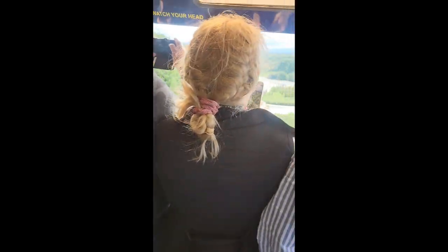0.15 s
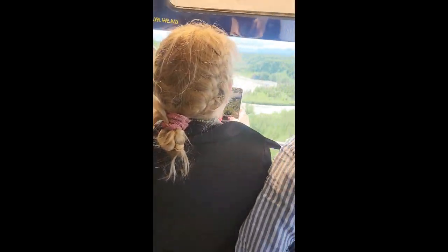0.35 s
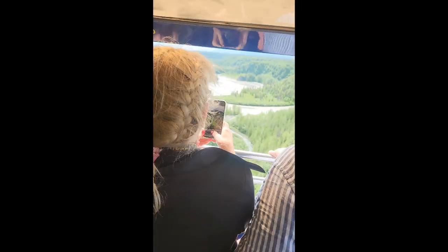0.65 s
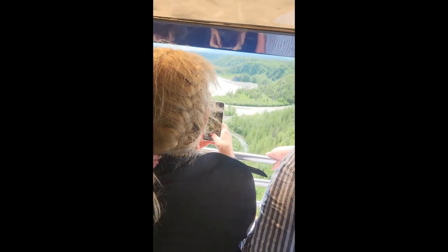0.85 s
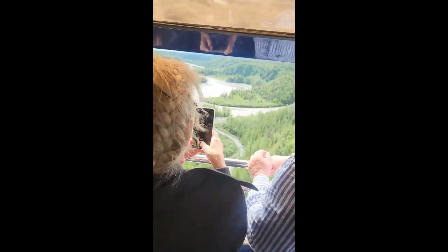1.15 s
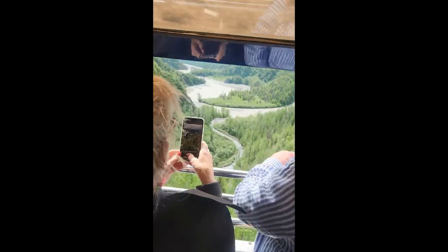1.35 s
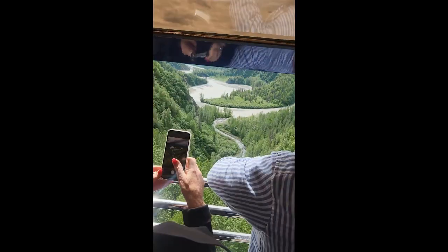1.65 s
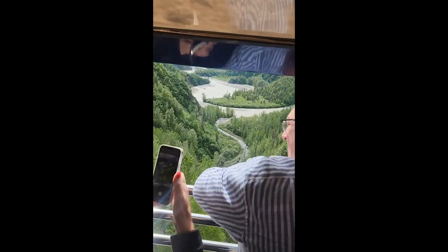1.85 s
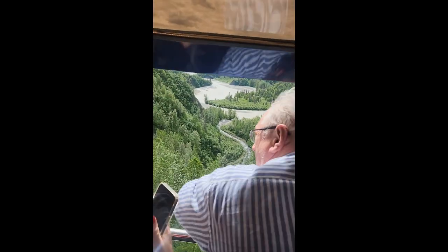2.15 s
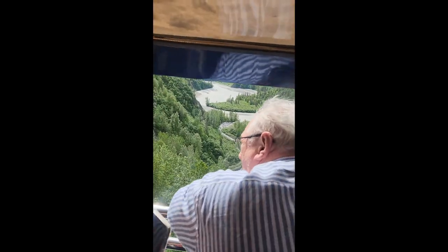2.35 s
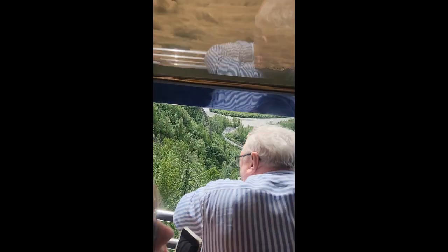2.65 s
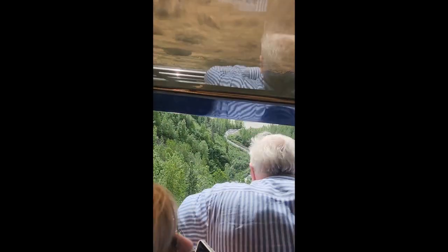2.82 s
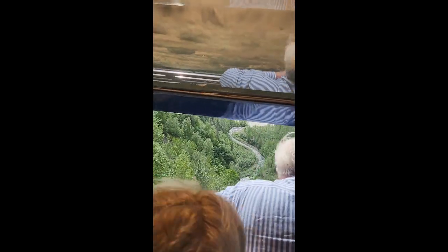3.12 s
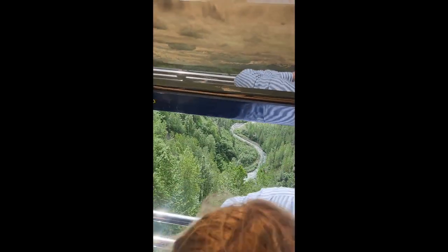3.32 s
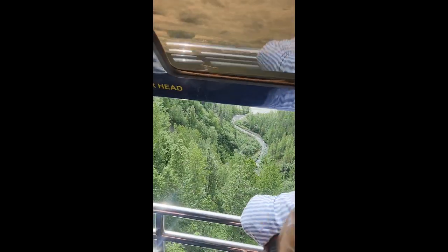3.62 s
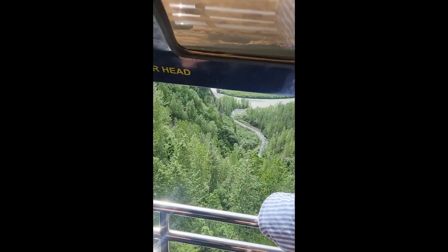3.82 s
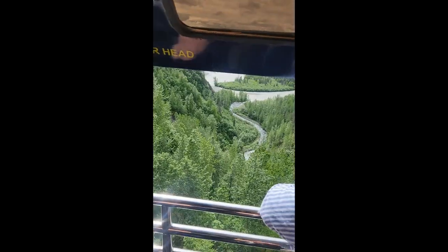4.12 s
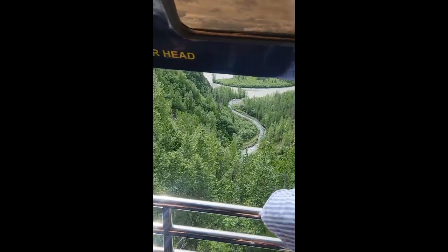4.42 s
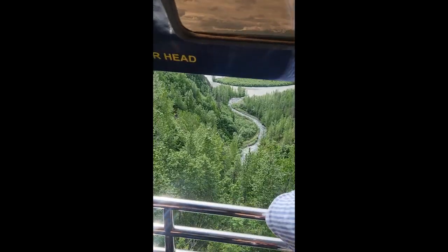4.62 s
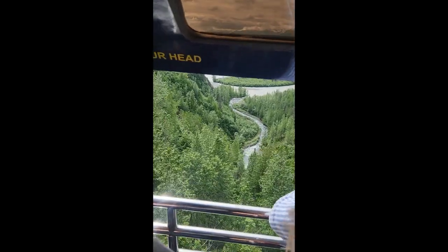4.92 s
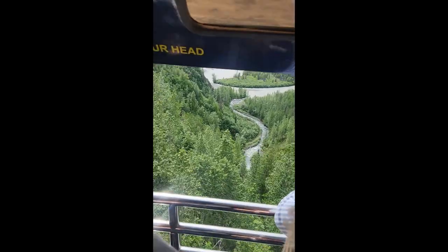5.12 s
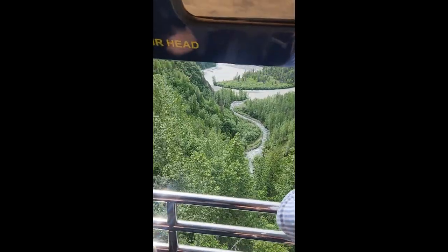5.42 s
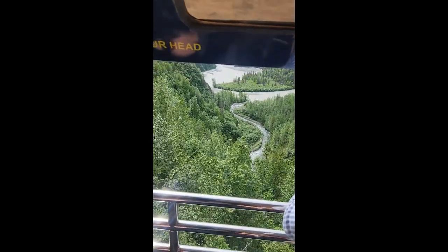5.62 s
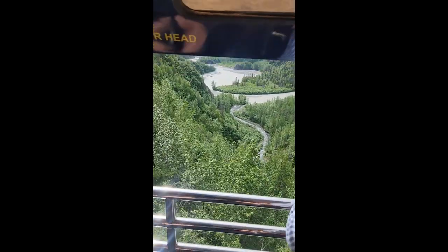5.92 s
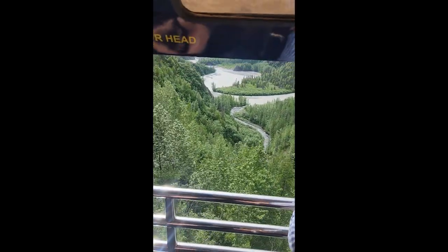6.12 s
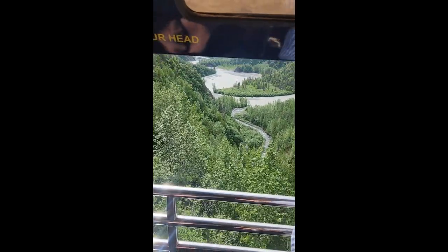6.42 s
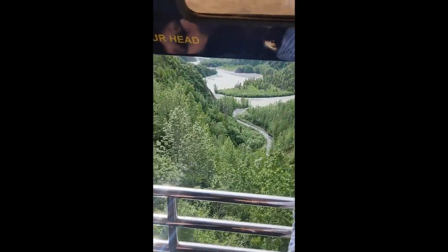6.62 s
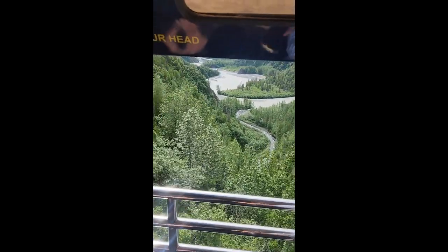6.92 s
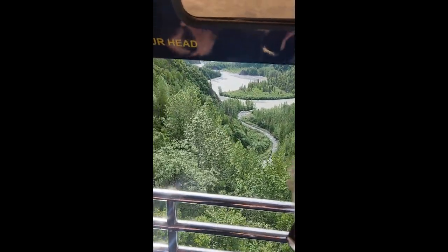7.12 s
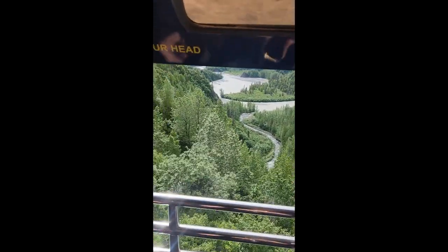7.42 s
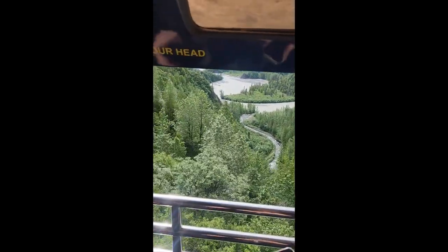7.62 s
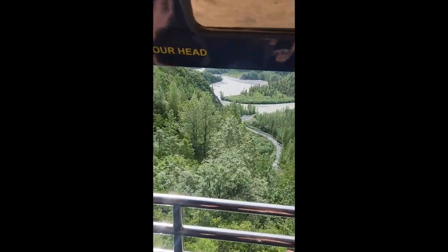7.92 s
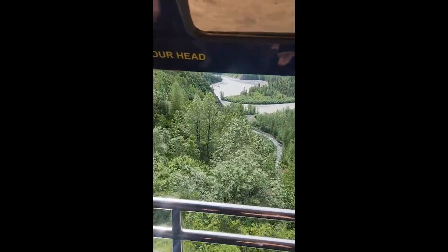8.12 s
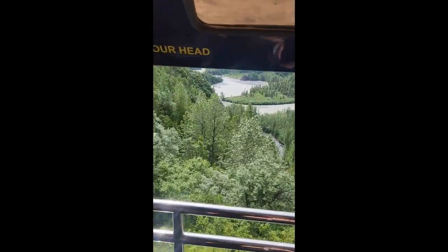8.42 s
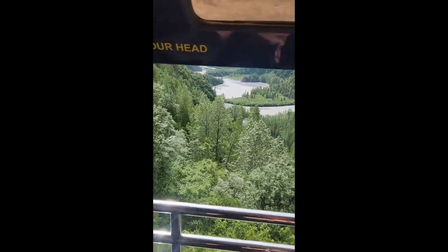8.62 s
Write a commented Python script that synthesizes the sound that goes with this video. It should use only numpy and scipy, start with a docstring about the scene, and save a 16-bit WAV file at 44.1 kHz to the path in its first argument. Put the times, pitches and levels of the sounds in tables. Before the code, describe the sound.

A passenger train creeps over a steel bridge with deep deck rumble, banging rail joints, loose rattling steel, thin wheel squeals and dry close ticks.

```python
"""A passenger train creeps over a steel bridge, heard from an open platform between coaches.
From the start the deck rumbles and the wheels roar and hiss, all made of shaped noise; small dry ticks
and knocks sound close to the right microphone of a hand-held pair, and wheels squeal in narrow tones.
From 1.7 s axles bang over rail joints: bursts of noise, a low boom and ringing loose steel.
A thin whine flickers from 6.7 s, a short rasp of steel on steel comes near the end; faint top noise stays."""
import sys
import numpy as np
from scipy import signal
from scipy.fft import rfft, irfft, next_fast_len
from scipy.io import wavfile
from scipy.ndimage import uniform_filter1d

SR = 44100
rng = np.random.default_rng(int(sys.argv[2]) if len(sys.argv) > 2 else 0)


def wav_record(signal):
    """Record a signal, one row per channel, as 16-bit PCM in the file named by sys.argv[1]."""
    frames = np.transpose(np.atleast_2d(signal))
    bounded = np.clip(frames, -1, 1)
    # unit amplitude maps onto the largest positive 16-bit level
    quanta = np.round(bounded * 32767).astype(np.int16)
    wavfile.write(sys.argv[1], SR, quanta)


N = 386316

# Bursts of shaking as axles cross rail joints; a bang may take two or three rows. Levels before each
# band's own colour. Each row: start in seconds, thud level in dB, clank level in dB,
# rattle level in dB, length of the shaking in seconds.
BANG_BURSTS = [(1.704, -22.5, -38, -45, 0.025), (1.735, -27, -29.5, -36.5, 0.016),
               (2.273, -15.5, -25, -41.5, 0.023), (2.359, -27.5, -33, -40, 0.02),
               (2.443, -14.5, -28.5, -10.5, 0.02), (2.467, -30, -19, -20, 0.022),
               (2.518, -32, -24, -30, 0.01), (3.016, -13, -21.5, -20.5, 0.02),
               (3.052, -27, -21, -28.5, 0.034), (3.101, -25.5, -38, -31.5, 0.03),
               (3.49, -17.5, -30.5, -45.5, 0.034), (4.068, -20.5, -38, -69, 0.029),
               (4.233, -15, -21, -26.5, 0.044), (4.811, -21, -35, -30, 0.02),
               (4.837, -19.5, -25.5, -27, 0.044), (5.179, -24, -60.5, -46, 0.013),
               (7.106, -25, -36, -47, 0.087), (7.544, -28, -40, -52, 0.039),
               (7.68, -13.5, -29, -33.5, 0.023), (7.85, -18.5, -32, -41, 0.022),
               (8.29, -24, -37, -48, 0.014), (8.348, -35, -32, -47, 0.024),
               (8.429, -18.5, -27.5, -38, 0.011)]
# How the two microphones differ in level. Each row: frequency in Hz, left level against right in dB.
SIDE_LEAN = [(150, .7), (310, -1), (550, -2), (950, -5.5), (1650, -10.5), (2860, -1), (4970, 8),
             (8640, 27.5), (15000, 9.5)]


def rolling():
    """Deck rumble below, wheel-on-rail roar and hiss above: noise bands that waver a little."""
    # Each row: time in seconds, deck rumble level in dB, wheel roar level in dB, wheel hiss level in dB.
    roll_levels = [(0.0, -25, -29.5, -45.5), (0.15, -25, -32.5, -55.5), (1.6, -23, -31.5, -55),
                   (1.9, -25, -32.5, -56.5), (2.6, -22.5, -32, -49.5), (2.93, -21, -28.5, -53),
                   (3.15, -17, -25, -43.5), (3.36, -18, -31.5, -52.5), (4.15, -24.5, -32, -53),
                   (4.95, -21.5, -30, -49.5), (5.4, -28.5, -33.5, -56), (5.6, -22, -33.5, -57.5),
                   (6.05, -25.5, -33, -53), (6.65, -23.5, -34, -54.5), (6.901, -21.5, -31, -50),
                   (7.9, -18.5, -32, -51), (8.251, -32.5, -33, -54), (8.45, -17.5, -28, -50.5),
                   (8.76, -24.5, -34, -56)]
    # Tone colour of the deck. Each row: frequency in Hz, relative strength in dB per Hz.
    rumble_colour = [(11, -43.5), (18, -8), (75, 1), (88, -0.5), (151, -17.5), (200, -18.5), (260, -39.5),
                     (440, -120)]
    # Tone colour of the wheels. Each row: frequency in Hz, relative strength in dB per Hz.
    wheel_colour = [(65, -31), (110, -6), (358, -15), (392, -12), (429, -18), (726, -19), (1340, -22.5),
                    (1450, -20), (2450, -33), (3390, -29), (5640, -33), (7400, -49), (8400, -100),
                    (10900, -130), (18500, -120)]
    hiss_from_hz = 2954
    s, *levels = np.transpose(roll_levels)
    rumble_db, roar_db, hiss_db = (np.interp(np.arange(N) / SR, s, c) for c in levels)

    rumble = rms_one(sum(pair for hz, pair in two_ports([30, 150], rumble_colour)))
    power = uniform_filter1d(rumble.mean(axis=0) ** 2, size=2400)
    rumble = rumble / (power + .1) ** 0.16      # the heavy deck evens out the swells

    roar, hiss, together = 0, 0, drift(1.8)
    for hz, pair in two_ports(np.geomspace(130, 7500, 16), wheel_colour):
        band = from_db(1.7 * together + 1.1 * drift(13)) * pair
        if hz < hiss_from_hz:
            roar = roar + band
        else:
            hiss = hiss + band
    wheels = from_db(roar_db) * rms_one(roar) + from_db(hiss_db) * rms_one(hiss)
    return from_db(rumble_db) * rms_one(rumble) + wheels


def booms():
    """The deck's low note as a wheel loads it: each boom swells quickly and sinks a little slower."""
    # Each row: time of the loudest moment in seconds, level in dB.
    boom_tops = [(1.73, -13), (2.027, -13.5), (2.3, -15), (2.465, -14.5), (3.03, -17.5), (4.12, -20.5),
                 (4.27, -18), (4.85, -22.5), (6.12, -21), (7.125, -12.5), (7.72, -15), (8.44, -27)]
    boom_hz, stray_share = 73, 0.1007
    rise_s, fall_s = 0.033, 0.053
    s, db = np.transpose(boom_tops)
    since = np.arange(N)[::40, None] / SR - s      # one row per 40 samples, one column per boom
    swell = np.exp(-(since / np.where(since < 0, rise_s, fall_s)) ** 2)
    power = (from_db(2 * db) * swell).sum(axis=1)
    pitch_hz = boom_hz * (1 + stray_share * drift(10.0))
    note = np.sqrt(2) * np.sin(2 * np.pi * np.cumsum(pitch_hz) / SR)
    return np.interp(np.arange(N) / 40, np.arange(len(power)), power) ** .5 * note


def bangs():
    """Bursts of shaking in the steelwork; every band starts, swells and dies in its own time."""
    # Centres of thud, clank and rattle, in Hz.
    part_hz = [330, 1500, 5000]
    # The bright rattle follows the thud. Each row: frequency in Hz, delay in seconds, rise in seconds,
    # time to die by 60 dB in seconds, colour in dB.
    band_shape = [(140, 0.0011, 0.0027, 0.53, -13), (614, 0.0005, 0.0014, 0.19, -10.5),
                  (2450, 0.0039, 0.0034, 0.95, -16.5), (3630, 0.024, 0.0014, 0.44, -17),
                  (5900, 0.0092, 0.018, 0.33, -14), (7500, 0.019, 0.0071, 0.36, -24),
                  (9000, 0.028, 0.0091, 0.24, -31.5)]
    strike_db, strike_s = 1.5, 0.0073      # the first contact stands above the shaking
    clatter_db, clatter_per_s = 2, 70
    clatter = from_db(clatter_db * drift(clatter_per_s))      # loose parts knock in all bands at once
    out = 0
    for hz, pair in two_ports(np.geomspace(140, 8000, 13), [(60, -60), (120, 0), (16000, -21)]):
        delay, rise, t60, colour_db = at_hz(band_shape, hz)
        drive = np.full(N, 1e-9)
        for s, *levels, length in BANG_BURSTS:
            start = round((s + delay) * SR)
            level_db = np.interp(np.log(hz), np.log(part_hz), levels) + colour_db
            drive[start:start + round(length * SR) + 1] = from_db(level_db)
            drive[start:start + round(strike_s * SR)] = from_db(level_db + strike_db)
        uneven = from_db(2.5 * drift(35))      # loose parts clatter unevenly
        out = out + dying(drive, t60, rise) * uneven * rms_one(pair)
    return out * clatter


def chatter():
    """After each burst loose parts knock unevenly on the steelwork, each knock with its own colour."""
    # What the loose parts ring with. Each row: frequency in Hz, relative level in dB,
    # time to die by 60 dB in seconds.
    ringing_steel = [(210, 0, .12), (365, -1, .09), (529, 0, .07), (653, -1, .08), (800, -7, .06),
                     (1090, -14, .05), (1416, -9, .07), (1630, -6, .06), (1900, -10, .05), (2250, -11, .05),
                     (2590, -13, .04), (3300, -17, .04), (4380, -16, .04), (5300, -16, .04)]
    knocks_per_s, knocks_db = 160, -6      # level against the clank of the burst
    knocks_t60_s, knocks_top_hz = .3, 5600
    drive = np.full(N, 1e-9)
    first = np.zeros(N, bool)
    for s, thud_db, clank_db, rattle_db, length in BANG_BURSTS:
        drive[round(s * SR):round((s + length) * SR) + 1] = from_db(clank_db + knocks_db)
        first[round(s * SR) + 40] = True      # one sure knock just after each burst starts
    chance = rng.random(N) < knocks_per_s / SR
    knocks = dying(drive, knocks_t60_s, .0003) * (2 * first + chance)
    out = 0
    for hz, db, t60 in ringing_steel:
        r, w = from_db(-60 / (t60 * SR)), 2 * np.pi * hz / SR      # loss and turn per sample
        push = knocks * rng.standard_normal(N) + 1e-18
        ring = signal.lfilter([0, np.sin(w)], [1, -2 * r * np.cos(w), r * r], push)
        out = out + from_db(db) * ring * sides(at_hz(SIDE_LEAN, hz)[0])
    return late_right(signal.sosfilt(signal.butter(4, knocks_top_hz, fs=SR, output="sos"), out))


def ticks():
    """A very short scratch rings a few dry modes; under it the casing is pulled in, snaps back and knocks."""
    # Levels before the lean to the right. Each row: time in seconds, peak of the scratch in dB
    # before its echo, top of the scratch in Hz, low knock level in dB.
    tick_list = [(0.2215, -25, 4440, -44), (0.2598, -15, 6000, -46), (0.6648, -20, 4100, -13),
                 (1.745, -14.5, 5500, -7.5), (2.452, -31, 6500, -26), (2.481, -17, 6000, -22),
                 (2.4955, -11, 3500, -8.5), (2.519, -6, 4000, -6.5), (2.705, -24, 4000, -46),
                 (2.807, -22.5, 3000, -44), (2.822, -19.5, 6550, -36), (2.922, -23, 6000, -36),
                 (2.961, -16, 5500, -30), (3.1398, -13, 3500, -35), (3.254, -26, 5500, -33),
                 (3.279, -14, 3500, -30), (3.356, -15, 5600, -39), (3.763, -10.5, 6000, -18.5),
                 (4.043, -29, 6500, -43), (5.009, -20, 3400, -34), (5.5539, -21.5, 3600, -38),
                 (6.925, -26, 6000, -48), (8.0163, -24, 3000, -11.5), (8.435, -27.5, 3000, -20)]
    # Each row: frequency in Hz before detuning, relative level in dB, time to die by 60 dB in seconds.
    dry_modes = [(1360, 2.5, 0.004), (2160, 0, 0.004), (2990, 0, 0.003), (4430, 2, .002), (5600, 0, .002)]
    scratch_s, dry_db = .0004, 24      # decay time of the scratch, its level against the modes
    pull_s, knock_hz, knock_t60_s = 0.0011, 245, 0.029
    echo_s, echo_db, smear_s = 0.0075, -10.5, .003      # a near wall returns each tick, smeared
    lean_db = -31.5      # left against right
    before, count = SR // 200, len(tick_list)      # samples ahead of each tick
    out, t = np.zeros((2, N + SR)), np.arange(-SR // 200, SR // 20) / SR
    after = np.maximum(t, 0)
    grit = rng.standard_normal((count, len(t))) * np.exp(-np.abs(t) / scratch_s) * (t > -.0005)
    grit = grit + 5 * (t == 0)
    smear = rng.standard_normal((count, SR // 50)) * np.exp(-np.arange(SR // 50) / SR / smear_s)
    detune = rng.uniform(.85, 1.15, (count, len(dry_modes)))
    for (s, peak_db, top_hz, knock_db), scratch, spot, wall in zip(tick_list, grit, detune, smear):
        modes = sum(np.sin(2 * np.pi * hz * k * after) * from_db(db - 60 * after / t60)
                    for (hz, db, t60), k in zip(dry_modes, spot))
        click = signal.fftconvolve(scratch, modes * np.minimum(after / 0.0004, 1))
        click = click[before:before + len(t)]
        scrape = signal.lfilter(*signal.butter(1, [700, 2500], "band", fs=SR), scratch)
        click = click + from_db(dry_db) * scrape
        click = signal.sosfilt(signal.butter(8, top_hz, fs=SR, output="sos"), click)
        click = from_db(peak_db) * click / np.abs(click).max()
        echo = np.convolve(click, wall / np.linalg.norm(wall))[:len(t)]
        click = click + from_db(echo_db) * np.roll(echo, round(echo_s * SR))

        swing = np.cos(2 * np.pi * knock_hz * t) * from_db(-60 * after / knock_t60_s)
        snap = np.where(t < 0, -np.exp(t / pull_s), swing)
        knock = from_db(knock_db) * signal.lfilter(*signal.butter(3, 950, fs=SR), snap)
        start = round(s * SR) - before
        out[:, start:start + len(t)] += (click + knock) * sides(lean_db)
    return out[:, :N]


def squeals():
    """Narrow squealing tones from the wheels; some have their octave in a second row."""
    # Each row: start in seconds, length in seconds, pitch in Hz, left level against right in dB,
    # level in dB before the gaps and wavering.
    squeal_list = [(0.81, .19, 2492, 0, -41), (0.81, .19, 4980, 13, -58), (1.09, .14, 2027, -11, -49),
                   (1.09, .14, 4054, 9, -59), (1.91, .12, 2492, 0, -49), (3.38, .14, 4750, 4, -61),
                   (3.48, .26, 3070, 0, -55), (3.72, .06, 4750, 4, -58), (3.77, .13, 5561, 5, -59),
                   (3.8, .17, 3859, 4, -56), (3.9, .32, 4740, -4, -54), (5.2, .12, 4735, 4, -62),
                   (5.62, .19, 1467, -12, -44), (5.73, .33, 2410, 3, -50), (5.73, .28, 4800, 7, -59),
                   (5.8, .37, 5556, 14, -59), (5.82, .15, 3058, 1, -58), (5.75, .6, 2242, 1, -56),
                   (5.8, .5, 6430, 18, -66), (6.15, .22, 7210, 17, -67), (6.28, .6, 4715, 7, -57),
                   (6.55, .09, 3854, 9, -58), (6.56, .27, 5640, 16, -55), (6.55, .47, 3034, -2, -53),
                   (6.6, .3, 2430, 5, -58), (6.74, .14, 4275, 9, -60), (6.76, .16, 5404, 9, -58),
                   (6.6, .4, 6440, 16, -66), (6.9, .3, 5560, 13, -58), (7.18, .09, 4350, 4, -56),
                   (8.08, .14, 2495, -2, -54), (8.46, .36, 2495, -1, -46), (8.32, .52, 3528, 4, -51)]
    out = np.zeros((2, N))
    for s, length, hz, lean_db, db in squeal_list:
        add_tone(out, s, length, hz, lean_db, db, waver_db=4)
    return out


def whine():
    """One long thin whine: a few overtones of one pitch, each flickering by itself."""
    start, length, pitch_hz = 6.74, 1.36, 969.5      # s, s, Hz
    # Each row: multiple of the pitch, left level against right in dB, level in dB before wavering.
    overtones = [(2, -5, -55), (3, -4, -55), (4, 4, -55), (6, 14, -56)]
    out = np.zeros((2, N))
    for multiple, lean_db, db in overtones:
        add_tone(out, start, length, multiple * pitch_hz, lean_db, db, waver_db=6)
    return out


def add_tone(out, start, length, hz, lean_db, level_db, waver_db):
    """Adds a tone, a quarter cycle apart at the ports, that strays, swells and breaks into beads."""
    stray_hz, stray_share = 5, .0025      # rate of the straying, share of the pitch
    flicker_per_s, swell_db, slip_loss_db = 36, 2.5, -2.5      # the loss is level lost to the gaps
    span = slice(round(start * SR), min(round((start + length) * SR), N))
    t = np.arange(span.stop - span.start) / SR
    stray = drift(stray_hz)[span]
    waver = np.minimum(drift(flicker_per_s)[span], 1.2)
    phase = 2 * np.pi * (np.cumsum(hz * (1 + stray_share * stray)) / SR + rng.random())
    tone = np.sqrt(2) * np.array([np.cos(phase), np.sin(phase)])
    gate = np.clip(np.minimum(t, length - t) / (length / 7), 0, 1)      # fades in and out
    gain = from_db(level_db + slip_loss_db + swell_db * stray + waver_db * waver)
    out[:, span] += tone * gate * sides(lean_db) * gain


def rasp():
    """One short rasp of steel on steel: a band of rough noise that swells and dies."""
    start, length, level_db, t60 = 8.345, 0.056, -43, 0.71      # s, s, dB, s
    t = np.arange(N) / SR
    band = signal.butter(3, [2340, 3600], "band", fs=SR, output="sos")
    noise = rms_one(signal.sosfilt(band, rng.standard_normal(N)))
    drive = from_db(level_db) * ((t > start) & (t < start + length)) + 1e-9
    return dying(drive, t60, 0.007) * noise


def top_noise():
    """Faint noise above 10.5 kHz, stronger on the left, with three short bursts."""
    # Levels before the high-pass and the lean. Each row: start in seconds, length in seconds,
    # level in dB, time to die by 60 dB in seconds.
    bursts = [(1.728, 0.029, -61, .1), (2.475, 0.038, -40, 0.13), (3.033, 0.046, -52, 0.2)]
    high = signal.butter(10, 10500, "high", fs=SR, output="sos")
    noise = signal.sosfilt(high, rng.standard_normal((2, N)))
    level, t = from_db(-83.0), np.arange(N) / SR
    for s, length, level_db, t60 in bursts:
        drive = from_db(level_db) * ((t > s) & (t < s + length)) + 1e-9
        level = level + dying(drive, t60, .004)
    return level * noise * sides(18.0)


def two_ports(centres, colour):
    """Yields (centre Hz, noise band at both ports): one coloured stereo noise cut into overlapping bands."""
    # How alike the two sides are. Each row: frequency in Hz, shared part of the noise from 0 to 1.
    likeness = [(50, .992), (110, .975), (300, .89), (600, .76), (1200, .57), (2500, .48), (5000, .6)]
    # By how much the left side leads. Each row: frequency in Hz, lead in radians.
    left_lead = [(0, 0), (150, .2), (1030, 2.1), (2410, 7.5), (8000, 25.2), (16000, 50)]
    # Cancellations by near walls. Each row: frequency in Hz, width in Hz, depth in dB.
    wall_dips = [(970, 69, -9), (1337, 120, -8), (465, 49, -3)]
    size = next_fast_len(N)
    hz = np.maximum(np.fft.rfftfreq(size, 1 / SR), 1)
    shared, left, right = rfft(rng.standard_normal((3, size)))
    alike = np.clip(at_hz(likeness, hz)[0], 0, 1)
    late = np.exp(-1j * np.interp(hz, *np.transpose(left_lead)))
    pair = np.sqrt(alike) * np.array([shared, shared * late]) + np.sqrt(1 - alike) * np.array([left, right])
    dips_db = sum(db / (1 + (2 * (hz - at) / wide) ** 2) for at, wide, db in wall_dips)
    pair = pair * sides(at_hz(SIDE_LEAN, hz)[0]) * from_db(at_hz(colour, hz)[-1] + dips_db)
    place = np.interp(np.log(hz), np.log(centres), np.arange(len(centres)))
    for k, centre in enumerate(centres):
        share = np.maximum(1 - np.abs(place - k), 0)      # neighbouring bands cross-fade
        yield centre, irfft(pair * share, size)[:, :N]


def dying(drive, t60, rise):
    """An envelope that follows the drive up at the rise time and dies away after it."""
    fall = 60 / t60 * np.arange(N) / SR      # dB lost since the start
    held = from_db(np.maximum.accumulate(20 * np.log10(drive) + fall) - fall)
    r = np.exp(-1 / (rise * SR))
    return signal.lfilter([1 - r], [1, -r], held)


def drift(rate):
    """Slow chance of spread 1: coarse noise, one value per 40 samples, through a double one-pole low-pass."""
    r = np.exp(-80 * np.pi * rate / SR)
    coarse = rng.standard_normal(N // 40 + 2002)
    slow = signal.lfilter([1], [1, -2 * r, r * r], coarse)[2000:]      # drops the filter's start-up
    return np.interp(np.arange(N) / 40, np.arange(len(slow)), rms_one(slow))


def sides(lean_db):
    """Left and right gains whose mean is 1."""
    gains = from_db(np.array([lean_db / 2, -lean_db / 2]).reshape(2, -1))
    return gains / gains.mean(axis=0)


def late_right(pair):
    """The right port hears half a millisecond later."""
    return np.array([pair[0], np.pad(pair[1], (round(.0005 * SR), 0))[:N]])


def from_db(db):
    """Gain of a level in dB."""
    return 10 ** (np.asarray(db) / 20)


def rms_one(x):
    """Scales a sound to an average (rms) level of 1."""
    return x / np.sqrt(np.mean(x ** 2) + 1e-20)


def at_hz(points, hz):
    """Columns of a table read on a log-frequency axis."""
    return [np.interp(np.log(hz), np.log(np.array(points)[:, 0]), c) for c in np.array(points).T[1:]]


def scene():
    """All sources at the two microphone ports, which pass little above 8900 Hz; then the top noise is added."""
    heard = rolling() + booms() + bangs() + chatter() + ticks() + squeals() + whine() + rasp()
    passed = signal.sosfilt(signal.cheby2(16, 60, 8900, fs=SR, output="sos"), heard)
    return passed + top_noise()


def record(dry):
    """The highest peaks are rounded off, and the top is cut by 16100 Hz."""
    rounded = dry / (1 + np.abs(dry / .97) ** 4) ** (1 / 4)
    return signal.sosfilt(signal.cheby2(16, 70, 16100, fs=SR, output="sos"), rounded)


dry = scene()
out = record(dry)
wav_record(out)
```